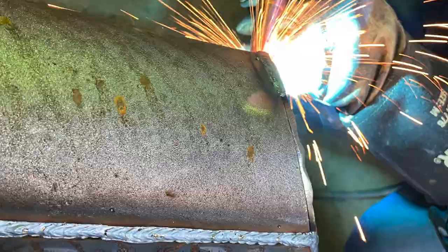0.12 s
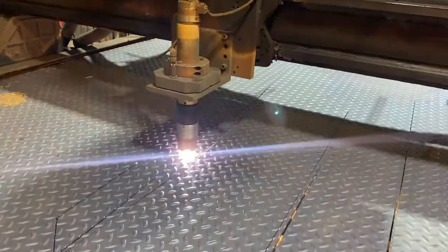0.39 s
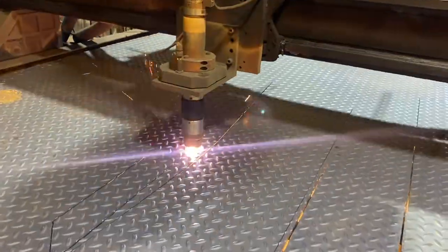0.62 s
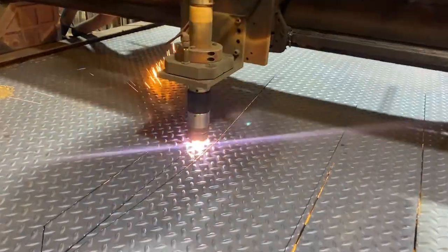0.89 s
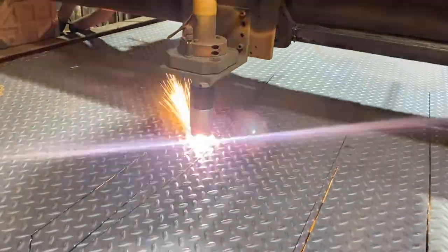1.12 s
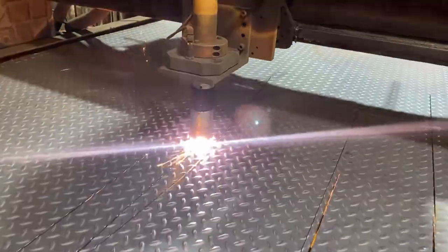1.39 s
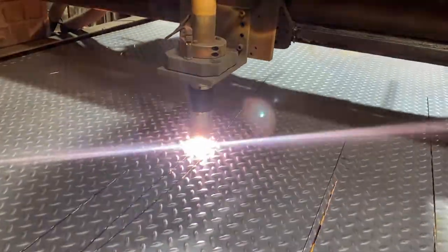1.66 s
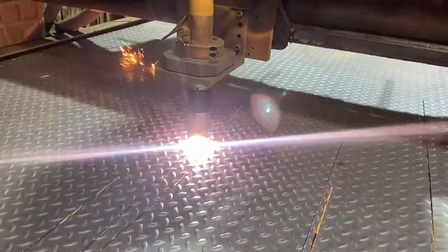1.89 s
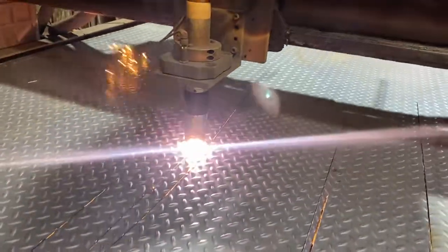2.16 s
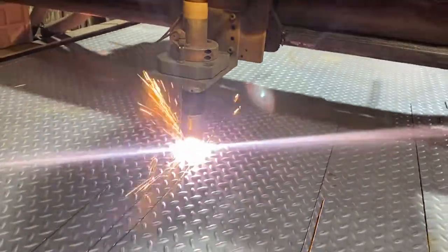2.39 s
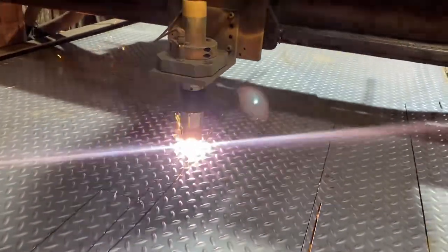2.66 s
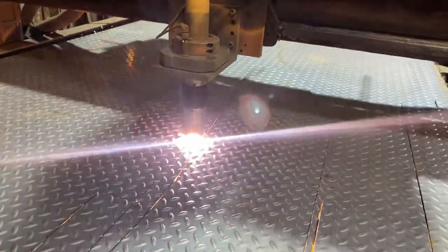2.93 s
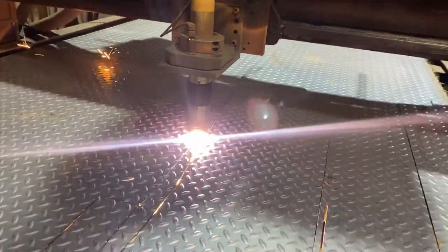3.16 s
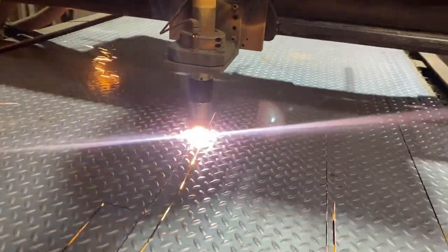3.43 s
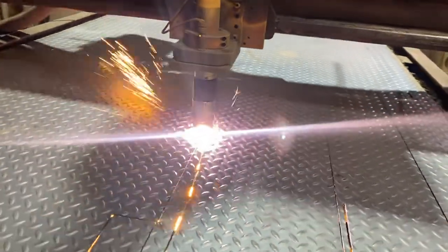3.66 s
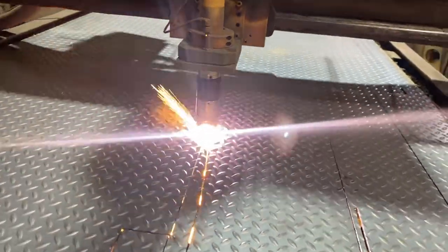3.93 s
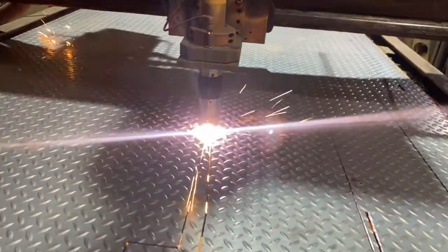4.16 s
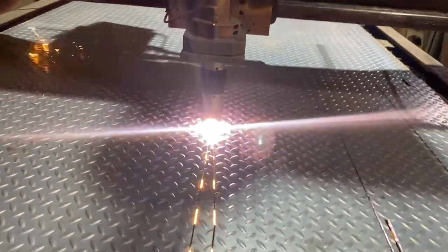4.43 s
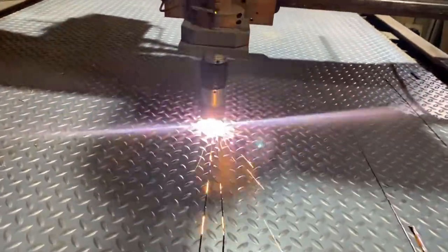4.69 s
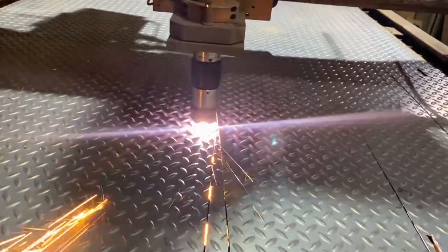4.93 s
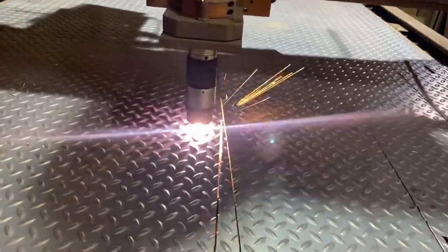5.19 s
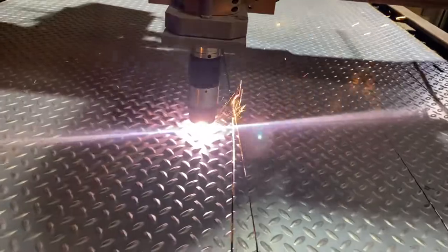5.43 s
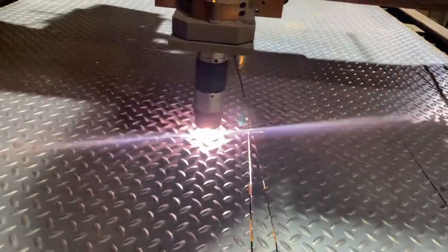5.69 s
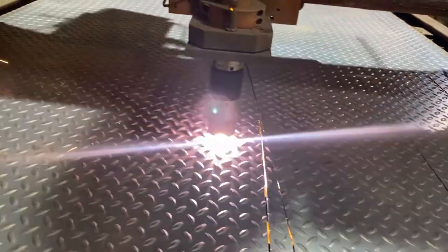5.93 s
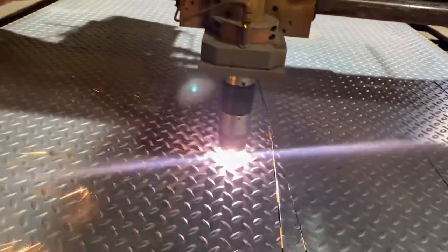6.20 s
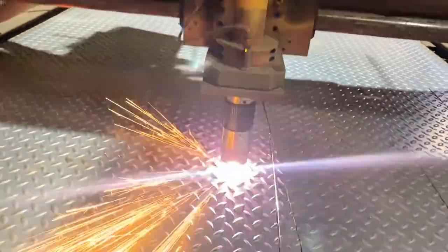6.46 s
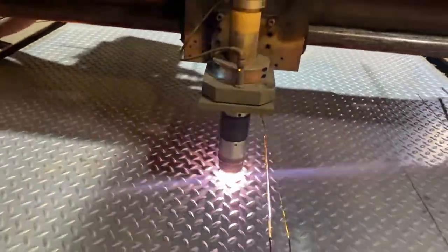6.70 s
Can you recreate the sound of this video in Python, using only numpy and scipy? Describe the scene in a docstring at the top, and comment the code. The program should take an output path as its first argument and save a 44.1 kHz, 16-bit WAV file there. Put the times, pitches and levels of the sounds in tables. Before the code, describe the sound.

A fierce, bright gas-jet hiss with a piercing steady whine cuts in suddenly and surges unevenly, above a humming, rumbling fabrication shop.

```python
"""After a short silence a plasma torch cutting steel plate in a workshop is switched on abruptly.
Shaped noise makes the hiss and roar of its gas jet; a shaken oscillator with overtones makes the nozzle
whistle, which slides down at first. Decaying noise tails return the torch from the walls, while noise and
wavering hums make the rumbling extractor and gantry table. Two microphone ports on a phone hear it all;
late on the torch moves round to another side of them."""
import sys
import numpy as np
from scipy import signal
from scipy.fft import rfft, irfft, next_fast_len
from scipy.io import wavfile
from scipy.ndimage import uniform_filter1d, map_coordinates

SR = 44100
rng = np.random.default_rng(int(sys.argv[2]) if len(sys.argv) > 2 else 0)


def pcm_store(signal):
    """Save signal as 16-bit PCM."""
    levels = np.round(np.clip(np.atleast_2d(signal), -1, 1) * 32767)
    wavfile.write(sys.argv[1], SR, levels.astype(np.int16).T)


def magnitude_from_level(level_db):
    """Linear magnitude for a level in decibels (20 dB per decade)."""
    exponent = np.asarray(level_db, float) / 20
    return 10 ** exponent


N = 301203
TIME = np.arange(N) / SR  # s

# Strength of the jet, surging and sagging as the torch crosses the plate.
# Each row: time in seconds, hiss level in dB.
JET_STRENGTH = [(0.28, -27.5), (0.4, -29), (0.68, -23.5), (0.78, -26), (1.15, -24.5), (1.37, -25),
                (1.57, -22), (1.7, -27), (1.83, -24), (2.0, -28), (2.12, -25.5), (2.25, -31), (2.43, -25),
                (2.67, -30), (3.16, -28.5), (3.4, -30.5), (3.65, -29.5), (4.3, -30), (4.6, -31.5),
                (5.08, -24), (5.22, -27.5), (5.32, -24), (5.7, -28.5), (5.9, -25.5), (6.04, -27),
                (6.11, -26), (6.37, -29.5), (6.45, -25.5), (6.7, -32.5), (6.83, -28.5)]
# Balance of the jet. Each row: time in seconds, body in dB over the hiss, roar in dB over the hiss.
JET_COLOUR = [(0.28, -4.5, -9), (0.68, -10.5, -11), (1.2, -7.5, -10), (2.7, -7.5, -11), (3.9, -6.5, -11.5),
              (4.4, -9, -9), (5.0, -3.5, -11.5), (5.5, -6.5, -7), (5.85, -12, -6), (6.4, -9.5, -7),
              (6.83, -16, -4)]
# Spectra of the jet's three bands. Each row: frequency in Hz, relative density in dB per Hz.
HISS_SPECTRUM = [(5500, -33), (7000, -10.5), (7600, 0.5), (8100, 5.5), (8800, -3.5), (10000, -1),
                 (12000, -3), (13500, -4.5), (15700, -9)]
BODY_SPECTRUM = [(4300, -30.5), (5200, -1.5), (5700, -0.5), (6500, 1.5), (7200, 3.5), (8200, -13.5)]
ROAR_SPECTRUM = [(900, -17.5), (1800, -14), (2300, -7), (2900, -3), (3300, -2.5), (4200, 2), (4800, 4),
                 (5400, 0), (6500, -22)]
# How strongly the nozzle sings.
# Each row: time in seconds, note in dB over the hiss, octave overtone in dB over the hiss.
NOZZLE_NOTE = [(0.28, -13, -26), (0.35, -12, -17), (0.41, 3, -13), (0.48, 4.5, -10), (0.68, 2, -10),
               (1.0, 6.5, -5), (1.5, 5.5, -4.5), (2.0, 2.5, -5), (2.25, 6, -4), (2.45, 2.5, -6),
               (2.7, 5.5, -3.5), (3.1, 1.5, -0.5), (3.35, -3.5, -7), (3.6, -2, -7), (3.72, -9.5, -10),
               (3.9, -1.5, -5), (3.98, -4.5, -3), (4.08, -1, -8), (4.3, -1, -0.5), (4.5, -0.5, -10),
               (4.65, 4, -1.5), (5.1, -1, -1.5), (5.5, 3.5, -2.5), (5.7, 4.5, -6), (5.8, 8, -7),
               (6.2, 5, -2), (6.83, 6.5, -4)]
# How the two ports hear the torch from its first and its last side.
# Each row: frequency in Hz, lead of the left port in radians, left over right in dB.
FIRST_SIDE = [(1500, -.9, 0), (2100, -.2, -.5), (2500, .15, -1), (3000, 1, -2.8), (3700, 1.9, -3),
              (4600, 1.8, -6.5), (5500, 3.1, .1), (6500, 4.9, -2.5), (7500, 3.6, -4.5), (8500, 3.14, .1),
              (9200, 2.2, 2.5), (10400, .2, 0), (11200, -.2, 0), (12500, -2, 0), (13000, -3, 0),
              (13900, -3.3, 0), (15300, -6.1, 0)]
LAST_SIDE = [(1500, .5, 0), (2600, .05, -.5), (3500, 1.1, -5), (4600, 1.4, -5.5), (5500, 2.2, -3),
             (6400, .3, -7), (7300, 2.3, -4), (8500, 2.6, -3), (9200, 2.3, -1.5), (10400, .25, 0),
             (11200, -.2, 0), (12900, -2.9, 0), (14100, -3.3, 0), (15300, -6.1, 0)]
# The torch moving round. Each row: time in seconds, share of the last side from 0 to 1.
MOVE_ROUND = [(5.55, 0), (5.95, 0.98)]
# Colour of the walls' answer. Each row: frequency in Hz, gain in dB.
WALL_COLOUR = [(1500, -3), (2300, -11), (3200, -4), (4600, -6), (5500, -8), (7000, -4), (8500, -13),
               (9600, -9), (10800, -16), (12000, -10), (13400, -16), (14600, -10), (15500, -16)]
# Levels of the workshop, louder at first.
# Each row: time in seconds, boom in dB, rumble in dB, low hum in dB, upper hum in dB.
SHOP_LEVELS = [(0.28, -40, -36, -52, -52), (0.64, -30, -37.5, -45, -55), (0.8, -37.5, -38, -49, -43.5),
               (1.4, -38, -39.5, -49, -49), (2.0, -44, -43, -53, -59), (2.3, -45.5, -43, -52.5, -53.5),
               (2.8, -42.5, -43.5, -50, -50), (3.05, -45.5, -45, -48, -64), (3.25, -43.5, -44, -52, -52),
               (3.7, -45.5, -45, -50, -60.5), (4.8, -47, -44, -51.5, -58.5),
               (5.2, -44.5, -44.5, -51.5, -53), (5.65, -43, -43.5, -51.5, -56.5),
               (6.05, -43.5, -42.5, -55, -53), (6.83, -47.5, -47, -51, -57.5)]
# Spectra of the workshop's noise. Each row: frequency in Hz, relative density in dB per Hz.
BOOM_SPECTRUM = [(25, -38), (45, -13), (65, -13), (75, -5), (81, 1), (88, -6), (98, -10), (118, -8),
                 (150, -15), (171, -7), (190, -17), (230, -40)]
RUMBLE_SPECTRUM = [(120, -20), (190, -8), (225, -3.5), (240, -3), (255, -4.5), (500, -6.5), (900, -10),
                   (1500, -13), (2200, -15), (4000, -26)]
# Wavering hums of the machines, the beating one at 374 Hz first.
# Each row: frequency in Hz, dB over the level it follows, rate of its waver in knots per second.
MACHINE_HUMS = [(374.4, -2, 1), (570.5, -1, 2), (239.3, -20, 5), (760.5, -22, 8), (751, -22, 8),
                (1500.5, -23, 6)]
# Brief low thumps in the table. Each row: time of the peak in seconds, rise of the boom in dB.
TABLE_THUMPS = [(0.5, 0), (1.05, 1.5), (2.05, 6), (2.45, 6.5), (2.85, 3.5), (3.88, 4), (5.03, 5), (5.32, 4),
                (5.82, 4), (6.55, 3)]
# The workshop at the ports. Each row: frequency in Hz, left-right likeness from 0 to 1,
# lead of the left port in radians, left over right in dB.
SHOP_AT_PORTS = [(35, .65, .05, -.8), (80, .86, .1, -2.3), (170, .72, .3, -2), (400, .62, .9, -.7),
                 (800, .42, 1.1, .8), (1300, .33, 1, -.4), (1800, .1, .2, .1)]


def unit(x):
    """Scaled to rms 1."""
    return x / np.sqrt(np.mean(x ** 2) + 1e-20)


def along(points, at):
    """Every column after the first, joined by straight lines."""
    x, *cols = np.transpose(points)
    return np.array([np.interp(at, x, c) for c in cols])


def slope(points, hz):
    """Gain of (Hz, dB) points on a log frequency axis."""
    f, db = np.transpose(points)
    return magnitude_from_level(np.interp(np.log(hz + 1), np.log(f + 1), db))


def wobble(rate):
    """A smooth random curve with rate knots a second."""
    return map_coordinates(rng.standard_normal(N // 20), [TIME * rate])


def filtered(x, response):
    """x times a complex response of frequency."""
    m = next_fast_len(N + 8192)
    return irfft(rfft(x, m) * response(np.fft.rfftfreq(m, 1 / SR)), m)[..., :N]


def rush(spectrum, patchy_db, channels=1):
    """Coloured noise of rms 1, with drifting patches of random gain shared by its channels."""
    z = signal.stft(rng.standard_normal((channels, N)), nperseg=512)[2]
    field = uniform_filter1d(rng.standard_normal(z.shape[1:]), 8, 0)  # over frequency
    field = uniform_filter1d(field, 10, 1)  # over time
    noise = signal.istft(z * magnitude_from_level(patchy_db * unit(field)), nperseg=512)[1][:, :N]
    return unit(filtered(noise, lambda hz: slope(spectrum, hz)))


def skew(lead, tilt_db):
    """The left port leads the right one; the level step is shared between them."""
    left = magnitude_from_level(tilt_db / 2) * np.exp(1j * lead)
    right = magnitude_from_level(-tilt_db / 2) + 0j
    return np.array([left, right])


def jet():
    """Turbulent gas: a bright hiss, a band of body below it and a lower roar from the kerf, fluttering together."""
    (hiss_db,) = along(JET_STRENGTH, TIME)
    body_db, roar_db = hiss_db + along(JET_COLOUR, TIME)
    flutter = 0.5 * wobble(20) + 0.55 * wobble(70)  # dB
    hiss = magnitude_from_level(hiss_db + flutter) * rush(HISS_SPECTRUM, patchy_db=1.0)[0]
    body_gain = magnitude_from_level(body_db + 0.88 * wobble(12) + 1.04 * flutter)
    body = body_gain * rush(BODY_SPECTRUM, patchy_db=1.35)[0]
    roar_gain = magnitude_from_level(roar_db + 0.49 * wobble(8) + 0.96 * flutter)
    roar = roar_gain * rush(ROAR_SPECTRUM, patchy_db=1.04)[0]
    return hiss + body + roar


def whistle():
    """The nozzle's edge tone: turbulence shakes its pitch and size, which smears the lines into skirts."""
    note_db, octave_db = along(JET_STRENGTH, TIME) + along(NOZZLE_NOTE, TIME)
    # the pitch slides down at ignition, then creeps up to 4595 Hz as the nozzle warms
    creep = 48 * np.exp(-TIME / 2.3)  # Hz below
    slide = 450 * np.exp((0.33 - TIME) / 0.05).clip(0, 3)  # Hz above
    jitter = 4 * wobble(10) + 8 * wobble(40) + 9 * wobble(200) + 18 * wobble(600)  # Hz
    turn = np.exp(2j * np.pi * np.cumsum(4595 - creep + slide + jitter) / SR)
    # breathy sidebands that lean 35 Hz to the low side of the note
    skirt = 0.075 * (wobble(220) + 1j * wobble(220))
    skirt = skirt + 0.03 * (wobble(900) + 1j * wobble(900))
    skirt = skirt * np.exp(-2j * np.pi * 35 * TIME)
    note = magnitude_from_level(note_db + 1.17 * wobble(28)) * (1 + skirt) * turn
    octave = magnitude_from_level(octave_db) * (1 + 4 * skirt) * turn ** 2
    third = magnitude_from_level(octave_db - 21) * turn ** 3
    return (note + octave + third).real


def direct(torch):
    """The torch straight at the ports: frequency-dependent lead and level, blended from side to side."""
    first = filtered(torch, lambda hz: skew(*along(FIRST_SIDE, hz)))
    last = filtered(torch, lambda hz: skew(*along(LAST_SIDE, hz)))
    share = np.clip(along(MOVE_ROUND, TIME), 0, 1)
    return (1 - share) * first + share * last


def walls(x, t60):
    """A decaying noise tail per port, drawn anew every quarter second and overlapped,
    so no single tail colours the sound."""
    hop, t = SR // 4, np.arange(SR // 2) / SR
    echo, x = np.zeros((2, N + 3 * SR)), np.pad(x, (hop, SR))
    window = np.sin(np.pi * np.arange(2 * hop) / (2 * hop))  # equal-power overlap
    for i in range(0, N + hop, hop):
        tail = rng.standard_normal((2, len(t))) * magnitude_from_level(-60 * t / t60)
        tail = tail / np.linalg.norm(tail[0])
        part = x[None, i:i + 2 * hop] * window
        wet = signal.fftconvolve(part, tail, axes=1)
        echo[:, i:i + wet.shape[1]] += wet
    return filtered(echo[:, hop:hop + N], lambda hz: slope(WALL_COLOUR, hz))


def hums(low_db, upper_db, rumble_db):
    """Machine tones: carriers wavering in size and phase, apart in each of three channels."""
    # a weaker second hum 1.625 Hz above the low one beats with it, loud at 0.76 s
    beat = 1 + magnitude_from_level(-8.5) * np.exp(2j * np.pi * 1.625 * (TIME - 0.76))
    total = np.zeros((3, N))
    for hz, db, rate in MACHINE_HUMS:
        sway = np.array([2.5 + wobble(rate) + 1j * wobble(rate) for _ in range(3)])
        if hz == MACHINE_HUMS[0][0]:
            sway, level_db = sway * beat, low_db
        elif rate < 3:
            level_db = upper_db
        else:
            level_db = rumble_db  # the wide hums ride on the rumble
        tone = (sway * np.exp(2j * np.pi * hz * TIME)).real
        total = total + magnitude_from_level(db + level_db) * unit(tone)
    return total


def shop():
    """Extractor and table: a boom, a lumpy rumble and narrow wavering hums, partly alike at the ports."""
    boom_db, rumble_db, low_db, upper_db = along(SHOP_LEVELS, TIME)
    thump_db = sum(db * np.exp(-((TIME - s) / 0.035) ** 2) for s, db in TABLE_THUMPS)
    boom_gain = magnitude_from_level(boom_db + thump_db + 0.8 * wobble(5))
    boom = boom_gain * rush(BOOM_SPECTRUM, patchy_db=1.0, channels=3)
    # the thumps swell the rumble by about half as many dB
    rumble_gain = magnitude_from_level(rumble_db + 0.48 * thump_db + 0.41 * wobble(6))
    rumble = rumble_gain * rush(RUMBLE_SPECTRUM, patchy_db=1.0, channels=3)
    beds = boom + rumble + hums(low_db, upper_db, rumble_db)

    def common(hz):
        """Response of the part that both ports share."""
        alike, lead, tilt_db = along(SHOP_AT_PORTS, hz)
        return np.sqrt(np.clip(alike, 0, 1)) * skew(lead, tilt_db)

    def private(hz):
        """Response of the part that each port has to itself."""
        alike, _, tilt_db = along(SHOP_AT_PORTS, hz)
        return np.sqrt(1 - np.clip(alike, 0, 1)) * skew(0, tilt_db)

    return filtered(beds[0], common) + filtered(beds[1:], private)


def scene():
    """Torch heard directly from a side that turns, and off the walls, over the workshop."""
    gas, note = jet(), whistle()
    # the note beams more than the hiss and reaches the walls weaker
    echo = walls(gas + magnitude_from_level(-9) * note, t60=0.3)
    return direct(gas + note) + echo + shop()


def roll_off(x):
    """The treble ends steeply here."""
    return signal.sosfilt(signal.butter(12, 17090, fs=SR, output="sos"), x)


def record(dry):
    """A band limit at 15750 Hz, then silence up to a switch-on ramp of a few milliseconds."""
    start, end = 0.2726, 0.2814  # s
    ramp = np.clip((TIME - start) / (end - start), 0, 1)
    mix = filtered(dry, lambda hz: hz < 15750) * ramp
    return roll_off(mix)


dry = scene()
out = record(dry)
pcm_store(out)
```